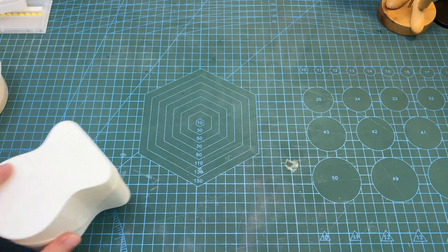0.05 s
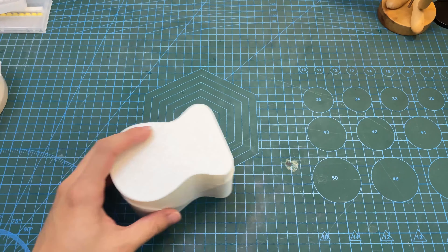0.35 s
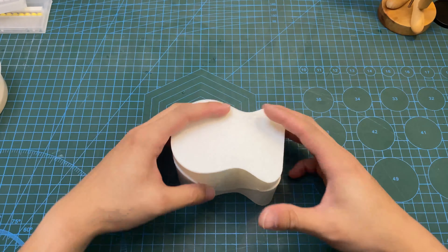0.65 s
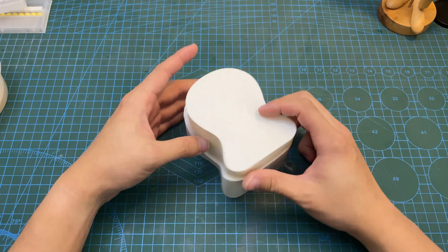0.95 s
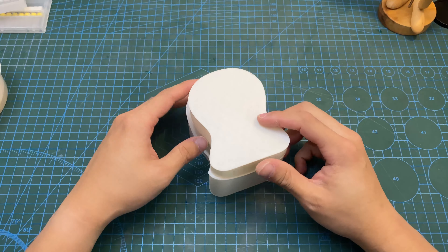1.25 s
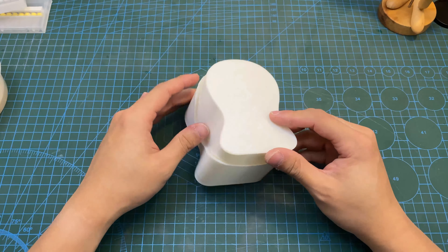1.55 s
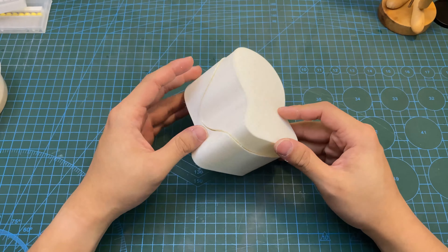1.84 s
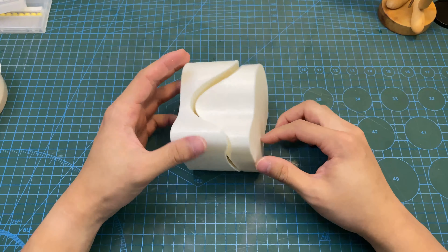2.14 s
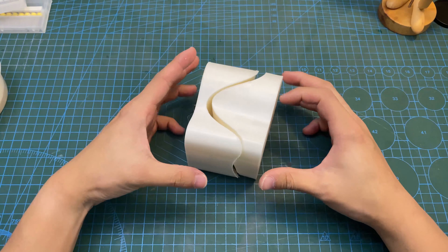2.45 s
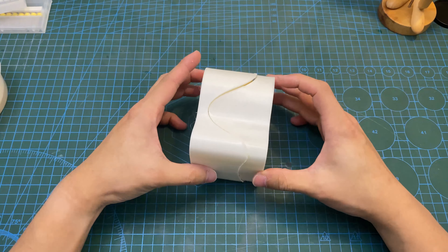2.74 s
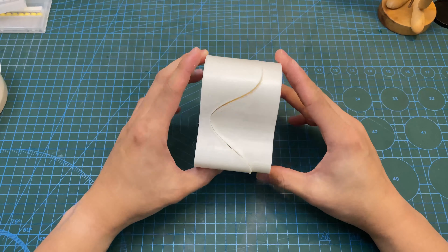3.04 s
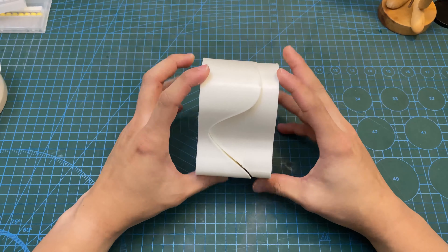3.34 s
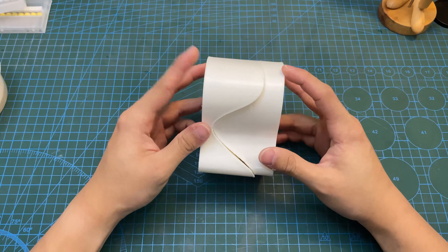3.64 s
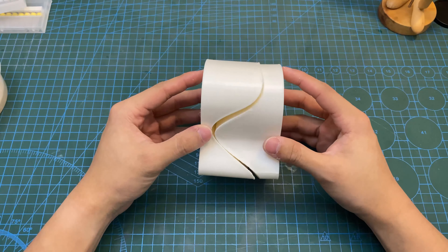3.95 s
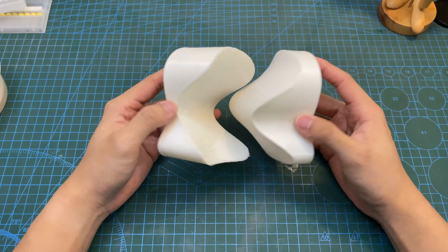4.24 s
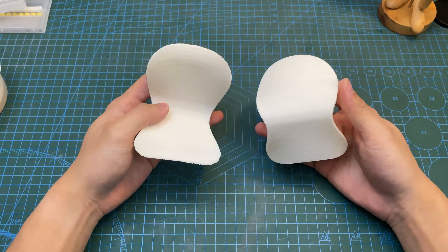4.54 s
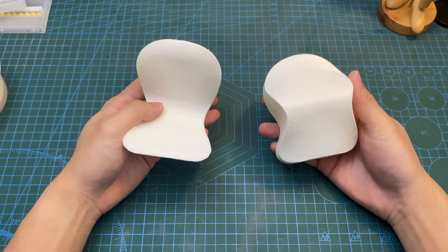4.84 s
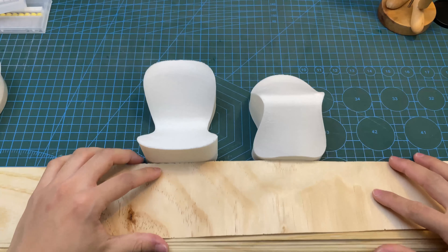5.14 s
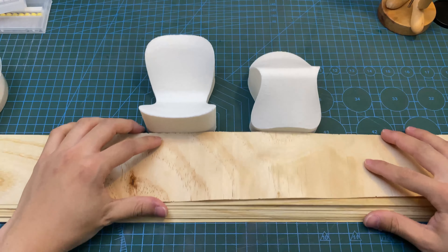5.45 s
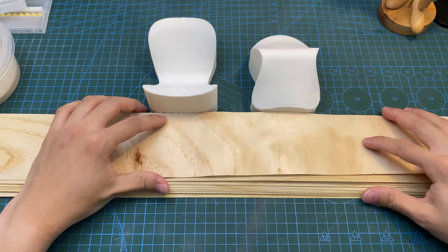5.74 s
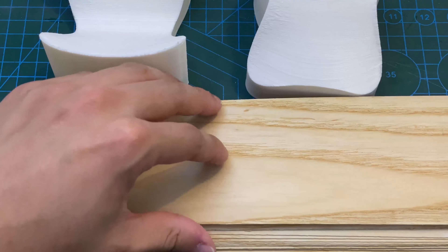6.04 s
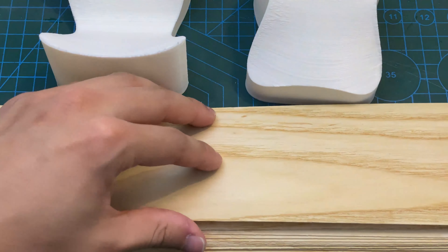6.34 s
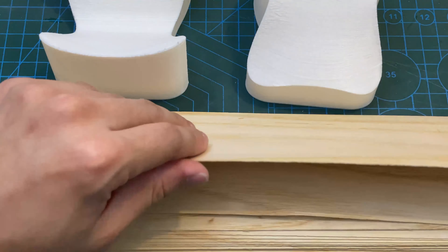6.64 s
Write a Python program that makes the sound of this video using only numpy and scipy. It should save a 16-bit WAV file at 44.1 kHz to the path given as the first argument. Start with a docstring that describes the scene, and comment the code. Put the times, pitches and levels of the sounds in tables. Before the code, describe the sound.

Close hollow plastic scrapes and clacks, followed by sliding plywood, fingers brushing wood and sheets slapping down, with a faint machine hum behind.

```python
"""A hollow two-part plastic form scrapes over a cutting mat, close up, above a faint machine hum.
It knocks on the bench, creaks as its halves are pressed shut, and clacks apart. Then a stack of thin
plywood is pushed across the mat, and fingers brush and lift its sheets, which clap back.
Each rub is a swarm of tiny slips, coloured by the object and swelling with the speed of the hand;
each knock is a dry snap over the short ring of plastic or wood, with a thump from the bench."""
import sys
import numpy as np
from scipy import signal
from scipy.fft import rfft, irfft
from scipy.io import wavfile
from scipy.ndimage import uniform_filter1d

SR = 44100
rng = np.random.default_rng(int(sys.argv[2]) if len(sys.argv) > 2 else 0)


def wrap_up_sound(samples):
    """Save the sound to the file named by the first command line argument, as 16-bit audio."""
    columns = np.atleast_2d(samples).T
    # keep every value between -1 and 1, then stretch to whole-number steps
    tamed = np.clip(columns, -1, 1)
    steps = np.round(tamed * 32767).astype(np.int16)
    wavfile.write(sys.argv[1], SR, steps)


N = 383229
TIME = np.arange(N) / SR
HZ = np.fft.rfftfreq(N, 1 / SR)
RING = np.arange(SR // 3) / SR  # time axis of one hit

# colour of the background rush of air: f/Hz, relative level/dB
AIR_COLOUR = [(15, -36), (25, -23), (54, -2.5), (125, -5), (167, -11.5), (264, -19), (354, -15), (515, -20),
              (729, -18), (1240, -19), (2020, -26.5), (2560, -29.5), (2930, -36.5), (11500, -51.5),
              (15000, -102)]
# tones of the background hum: from t/s, to t/s, f/Hz, width/Hz, level/dB
HUM_TONES = [(0, 8.7, 43.1, 2.6, -54), (0, 6.04, 176.7, 1.88, -59.5), (6.04, 7.6, 175.6, 3.44, -72.5),
             (6.04, 7.6, 292.5, 30, -71), (6.04, 7.6, 536, 72, -78), (7.6, 8.7, 161.8, 4.17, -63),
             (7.6, 8.7, 1260, 167.6, -71), (0, 8.7, 723, 21, -78), (0, 6.04, 1260, 69, -78.5),
             (3.4, 6.04, 2548, 25.3, -79), (7.6, 8.7, 2543, 98, -76.5)]

# stereo likeness of room tone, mat rubs and finger rubs: f/Hz, left-right correlation
ROOM_LIKENESS = [(60, 1), (130, 0.66), (290, 0.49), (640, -0.33), (1410, -0.055), (3100, 0.19),
                 (6820, -0.12), (15000, 0.73)]
MAT_LIKENESS = [(60, 1), (150, 0.99), (290, 0.59), (640, 0.96), (1400, 0.2), (3100, 0.058), (7000, 0.38),
                (12000, 0.79)]
FINGER_LIKENESS = [(60, 0.97), (130, 1), (290, 1), (640, 0.82), (1410, 1), (3100, 1), (6820, 1),
                   (15000, 0.18)]
# stereo balance, with the bass leaning right: f/Hz, left minus right level/dB
BALANCE = [(60, -3.0), (110, -1.5), (200, -5.5), (300, -3.5), (400, -2.5), (560, 0.5), (750, 2), (1290, 0),
           (2380, -0.5), (4400, 2.5), (8120, -1), (15000, 0)]
# lead of the left microphone port over the right at off_axis = 1: f/Hz, phase/rad
PORT_PHASE = [(100, -0.05), (300, -0.26), (650, 1.5), (1500, 1), (3000, 2.04), (5000, 2.5), (6000, 1.55),
              (7500, 1.25), (8700, 5.5), (10500, -1.1), (11600, 0.5), (13000, -6)]

# colours of the rubs: f/Hz, relative level/dB
FINGER_COLOUR = [(100, -1), (250, -5), (400, -5.5), (530, 4.5), (750, 0.5), (900, 8.5), (1130, -6),
                 (1300, 5.5), (1700, -0.5), (2300, -2.5), (2950, -2), (4200, -10.5), (7500, -17),
                 (8500, -21), (11000, -17), (15000, -25.5)]  # fingertips on wood grain
SKIN_COLOUR = [(500, -20), (1000, 3), (2000, -2.5), (4000, -3.5), (8000, -12.5), (11000, -10), (15000, -19)]  # scuffing skin
STACK_COLOUR = [(60, -18), (120, -4), (200, 9), (300, -1.5), (410, -10), (530, 4), (740, -13), (940, 0.5),
                (1100, -7.5), (1300, -0.5), (1680, -6.5), (2050, -12), (2550, -12.5), (3200, -15.5),
                (6500, -18), (8500, -21.5), (11500, -21), (15000, -27)]  # plywood on the mat
FLAT_COLOUR = [(35, -43), (60, -13), (70, -23), (125, -15), (157, -12.5), (196, 4.5), (335, -9),
               (375, -10.5), (479, -11.5), (524, -7.5), (749, -21.5), (837, -5.5), (1140, -15), (1340, -11),
               (1570, -17), (1750, -12), (2000, -21), (2620, -19), (3060, -23.5), (4680, -24.5),
               (8180, -36.5), (10500, -32.5), (12500, -36), (16200, -52), (22000, -120)]  # the form lying on the mat
HELD_COLOUR = [(35, -28), (60, -12), (234, -0.5), (438, -13), (524, -9.5), (586, -13.5), (700, -19),
               (916, -11), (1200, -19), (1370, -17.5), (1530, -24), (1830, -16.5), (2190, -28),
               (2860, -21.5), (4180, -27.5), (4890, -24.5), (5350, -31), (5720, -31), (8360, -37),
               (11200, -34), (12500, -38), (16200, -66), (22000, -120)]  # the form in the hands

# modes of the struck parts: f/Hz, relative level/dB, unstretched t60/s
BENCH_MODES = [(66, -15.5, 0.25), (104.6, -11, 0.24), (126.5, -2.5, 0.15), (188, -3, 0.1), (227, 1.5, 0.11),
               (275, 4.5, 0.035), (323, -7, 0.047), (381, -3, 0.078), (468, -10, 0.06)]
VENEER_MODES = [(1590, 8, 0.018), (1823, 9.5, 0.025), (2750, 1.5, 0.021), (2970, 0.5, 0.021),
                (3470, 3, 0.018), (3900, -3, 0.018), (4520, -1, 0.015), (5070, -6.5, 0.015),
                (5760, -11, 0.012), (6400, -4, 0.013), (6970, -5, .018), (7840, -7, 0.018)]  # the papery top layer of the plywood
SHEET_MODES = [(292, -18, 0.19), (445, -4, 0.053), (512, 3, 0.047), (617, 3, 0.048), (750, -2, 0.048),
               (946, 0, 0.075), (1023, -5, 0.12), (1200, -6, 0.034), (1790, 0.5, 0.042), (2320, 1, 0.063),
               (2670, -1.5, 0.057), (3050, -3, 0.058)]  # one plywood sheet
SHELL_MODES = [(396, -1, 0.033), (522, 1.5, 0.1), (673, -0.5, 0.039), (778, 0, 0.04), (863, 0.5, 0.07),
               (1015, 2, 0.046), (1310, 0, 0.019), (1420, -9, 0.02), (1880, -2.5, 0.05), (1970, -2, 0.065),
               (3104, -6.5, 0.039), (3450, 0, 0.031), (3940, -1, 0.035), (4830, 5.5, 0.034),
               (5670, -8, 0.035)]  # the hollow form
RIM_MODES = [(1930, 1, 0.042), (2800, -4, 0.055), (3190, -1, 0.041), (3950, 4.5, 0.035), (4850, -8, 0.031),
             (5600, -9, 0.036)]  # the rims where its halves meet

# fingertip strokes on the plywood: fastest t/s, rise/s, fall/s, scrape level/dB, hiss/dB re scrape
FINGER_STROKES = [ (5.898, 0.02, 0.063, -74, 3), (6.015, 0.048, 0.017, -60.5, -5),
                  (6.38, 0.084, 0.063, -67.5, -1.5), (6.61, 0.12, 0.057, -59.5, 1.5),
                  (6.84, 0.14, 0.11, -50.5, -6.5), (6.931, 0.026, 0.023, -46.5, -10),
                  (7.04, 0.066, 0.045, -50.5, -7.5), (7.125, 0.046, 0.03, -60.5, -10),
                  (7.215, 0.042, 0.049, -54.5, -6.5), (7.287, 0.014, 0.022, -44, -7),
                  (7.322, 0.014, 0.015, -53.5, -9), (7.40, 0.068, 0.077, -52.5, -2),
                  (7.527, 0.092, 0.0071, -51, 1.5), (7.61, 0.33, 0.15, -62, -3.5),
                  (7.83, 0.068, 0.1, -70.5, 1.5), (8.089, 0.075, 0.056, -68, -5.5),
                  (8.385, 0.031, 0.025, -67.5, 0), (8.63, 0.051, 0.058, -65, 6.5)]
# quick scuffs of skin and edges: middle t/s, length/s, level/dB, resonance f/Hz, width/Hz
SCUFFS = [(0.967, 0.04, -43.5, 3120, 300), (1.013, 0.044, -62, 4200, 900), (1.891, 0.038, -54, 3020, 900),
          (1.302, 0.1, -69, 11200, 1500), (2.05, 0.09, -64, 11300, 400), (2.16, 0.043, -53, 5600, 500),
          (2.183, 0.011, -40.5, 3400, 900), (2.163, 0.037, -48, 1920, 250),
          (2.299, 0.042, -42.5, 1950, 200), (3.075, 0.08, -58.5, 1940, 150), (3.355, 0.018, -46, 1970, 250),
          (3.338, 0.01, -56, 3500, 300), (3.662, 0.016, -49, 2500, 200), (3.691, 0.018, -41.5, 2400, 450),
          (3.787, 0.028, -49, 2530, 253), (3.868, 0.012, -44, 2600, 399), (3.902, 0.066, -58, 2460, 150),
          (7.123, 0.021, -54, 1030, 250), (7.32, 0.012, -54.5, 7800, 250),
          (7.56, 0.0051, -42.5, 6800, 1210), (8.615, 0.076, -63, 2980, 248)]
# plywood claps (the hand grabbing the stack, its edge catching, sheets falling back): t/s, sheet level/dB,
# brightness f/Hz, thump level/dB, ring time factor, tick level/dB,
WOOD_CLAPS = [ (5.034, -43, 3550, -66, 0.68, -48, 1.54, -40, 1500),
              (5.611, -44, 3500, -54, 0.66, -50, 1.44, -35, 1400),
              (6.372, -47, 4030, -70, 0.17, -50.5, 1.6, -51, 2500),
              (6.7135, -51, 3970, -70, 0.25, -38, 0.96, -54, 3000),
              (6.749, -22.5, 2220, -35, 0.907, -31.5, .95, -20.5, 570),
              (6.757, -38, 800, -36, 1.28, -58, 0.99, -33, 330),
              (6.791, -51, 2900, -42, 0.79, -58, 1.2, -42, 1690),
              (6.939, -41, 3500, -60, 0.47, -47, 1.3, -43, 1700),
              (6.980, -50, 3980, -68, .4, -43, 1.1, -50, 2500),
              (7.176, -45, 4000, -52, 0.43, -46, 1.15, -45, 1700),
              (7.278, -48, 3950, -68, 0.62, -48, 1.16, -45, 1700),
              (7.565, -23, 1250, -54, 0.87, -43, 1.08, -21.5, 840),
              (7.571, -23.5, 1000, -28.5, 1.14, -49, 1.24, -31, 650),
              (8.556, -35, 2000, -70, 0.64, -41.5, 1.53, -26.5, 1020)]
# strokes of the form over the mat and through the hands:
# fastest t/s, rise/s, fall/s, scrape level/dB, hiss/dB re scrape, rumble/dB re scrape
FORM_STROKES = [ (0.04, 0.29, 0.16, -45, -5.5, -12), (0.117, 0.015, 0.025, -43.5, -18, -7),
                (0.203, 0.02, 0.015, -44, -14, 1), (0.26, 0.24, 0.32, -41.5, -9, -1.5),
                (0.29, 0.032, 0.021, -41.5, -25, 2.5), (0.465, 0.037, 0.025, -45, -16, -2),
                (0.70, 0.52, 0.23, -51.5, -8.5, 9), (1.0, 0.073, 0.057, -43.5, -9.5, 0),
                (1.31, 0.037, 0.094, -64.5, -6, 7.5), (1.596, 0.043, 0.047, -49.5, -12.5, 1.5),
                (1.70, 0.08, 0.058, -57.5, -13, 12.5), (2.04, 0.083, 0.1, -47, -14.5, 6.5),
                (2.178, 0.036, 0.024, -37, -15.5, 1.5), (2.26, 0.091, 0.041, -49, -16, 9),
                (2.39, 0.038, 0.034, -54, -9.5, 8.5), (2.50, 0.074, 0.1, -62, -5, -1.5),
                (2.61, 0.02, 0.025, -55, -16, 14), (2.705, 0.048, 0.028, -49, -15.5, 7.5),
                (2.89, 0.044, 0.037, -59.5, -12, 6), (2.99, 0.083, 0.055, -63, -15, 17.5),
                (3.11, 0.073, 0.062, -55.5, -17, 9), (3.40, 0.096, 0.056, -62.5, -15, 6.5),
                (3.50, 0.057, 0.035, -68, 0, 12), (3.70, 0.072, 0.049, -57.5, -8.5, 8.5),
                (3.93, 0.11, 0.052, -61.5, -12, 10), (4.08, 0.045, 0.024, -66, -19, 11),
                (4.42, 0.11, 0.13, -61.5, -10, -17), (4.53, 0.077, 0.055, -64.5, -2, -9)]
# hard catches of the rims as the halves slide home: t/s, level/dB
RIM_CATCHES = [(2.585, -46.5), (2.61, -51), (2.624, -53), (2.634, -51), (2.647, -46.5), (2.654, -47),
               (2.674, -51), (2.686, -44), (2.706, -53)]
# knocks of the form: t/s, shell level/dB, base brightness f/Hz, thump level/dB, snap level/dB, snap f/Hz
FORM_KNOCKS = [ (0.246, -35, 2000, -46, -38, 1000), (0.266, -33, 1500, -41, -38, 800),
               (0.291, -34, 800, -25.5, -34, 450), (0.812, -32, 1700, -24, -33.5, 560),
               (0.914, -32.5, 2200, -26, -37, 900), (0.918, -28.5, 1020, -22.5, -34, 455),
               (0.943, -31, 900, -33, -40, 400), (1.067, -49, 550, -32.5, -37, 370),
               (1.345, -56, 400, -36, -39, 300), (1.875, -43, 1560, -31, -47, 550),
               (1.889, -31.5, 750, -28.5, -37, 420), (2.1868, -12.5, 800, -11.5, -16, 710),
               (2.2792, -16, 1560, -12.5, -15.5, 468), (2.311, -29.5, 1600, -19, -28, 403),
               (2.321, -28, 750, -28, -29, 447), (2.331, -25.5, 560, -31, -36, 480),
               (2.341, -31, 520, -39, -41, 450), (2.380, -39, 2300, -30, -49, 400),
               (2.588, -46.5, 3070, -35, -51, 397), (2.633, -41, 1700, -40, -42, 1000),
               (2.722, -43, 4960, -34, -43, 450), (2.847, -38, 2600, -63, -33.5, 1220),
               (3.026, -36, 1540, -34, -38.5, 910), (3.031, -36.5, 1400, -36.5, -39, 756),
               (3.053, -40.5, 1910, -36, -41, 1300), (3.257, -46, 700, -35, -47, 300),
               (3.334, -47, 900, -29.5, -45, 302), (3.344, -31.5, 2550, -26, -32.5, 1500),
               (3.357, -31, 1380, -23, -30, 404), (3.563, -39.5, 1920, -26, -29, 318),
               (3.660, -36.5, 1190, -27, -43, 700), (3.665, -45, 850, -24, -31.5, 387),
               (3.673, -44, 700, -28, -34, 335), (3.879, -41, 1210, -27.5, -38, 303),
               (3.91, -44, 1700, -36, -41, 1400), (3.926, -46, 1800, -39, -42.5, 1400),
               (4.018, -48, 1905, -60, -43, 1690)]


def amp(db):
    """Decibels to gain."""
    return 10 ** (np.asarray(db) / 20)


def unit_rms(x):
    """Scales to rms 1."""
    return x / np.sqrt(np.mean(x ** 2) + 1e-20)


def curve(points, hz=HZ):
    """Reads a spectrum table on a log-frequency axis."""
    f, value = np.transpose(points)
    return np.interp(np.log(hz + 1), np.log(f + 1), value)


def add(mix, s, sound):
    """Drops a sound into the stereo mix at time s."""
    part = mix[:, max(round(s * SR), 0):][:, :sound.shape[-1]]
    part += sound[..., :part.shape[-1]]


def eq(x, gain):
    """Filters a full-length sound with a gain for each frequency."""
    return irfft(rfft(x) * gain, N)


def soften(x, hz, order=2):
    """Low-pass: a softer contact lasts longer and excites less treble."""
    return signal.sosfilt(signal.butter(order, min(hz, SR * .45), fs=SR, output="sos"), x)


def excite(drive, response):
    """Plays a signal through a stereo impulse response."""
    return signal.fftconvolve(drive, response, axes=1)[:, :N]


def stereo(two, likeness):
    """Blends two unrelated sounds into a left and a right with the given correlation."""
    same = np.clip(curve(likeness), -.99, .99)
    mid, side = eq(two[0], np.sqrt(1 + same)), eq(two[1], np.sqrt(1 - same))
    return np.array([mid + side, mid - side])


def wander(hz):
    """Slow random motion of rms 1."""
    return unit_rms(eq(rng.standard_normal(N), 1 / (1 + (HZ / hz) ** 4)))


def during(start, stop):
    """A soft-edged gate, open between two times."""
    return uniform_filter1d(((TIME >= start) & (TIME < stop)) * 1., size=2000)


def stroke(s, rise_s, fall_s):
    """Speed of a hand movement: a bell that swells to 1 at time s and dies away."""
    distance = abs(TIME - s) / np.where(TIME < s, rise_s, fall_s)
    return np.exp(-np.minimum(distance, 10) ** 2.2)


def effort(moves, hiss_power=0.93, rumble_power=0.77):
    """Envelopes of scrape, hiss and rumble: each follows a power of the speed of the moves."""
    energy = np.zeros((3, N))
    for speed, db, hiss_db, rumble_db in moves:
        moving = speed > .001
        swell = speed[moving] ** np.array([[1], [hiss_power], [rumble_power]])
        energy[:, moving] += (amp([[db], [db + hiss_db], [db + rumble_db]]) * swell) ** 2
    return np.sqrt(energy)


def friction(colour, likeness, per_s, spread_db, judder_db, judder_hz, ripple_db, ripple_hz, body_db):
    """Tiny uneven slips ring a body; the hand judders, and the colour ripples as the contact travels."""
    slips = (rng.random((2, N)) < per_s / SR) * rng.standard_normal((2, N))
    slips *= amp(spread_db * np.minimum(rng.exponential(1, N), 4) + judder_db * wander(judder_hz))
    crowded_modes = unit_rms(uniform_filter1d(rng.standard_normal(len(HZ)), size=600))
    body = eq(stereo(slips, likeness), amp(body_db * crowded_modes))
    hz, _, frames = signal.stft(body, SR, nperseg=512, noverlap=384)
    ripple = uniform_filter1d(rng.standard_normal(frames.shape[1:]), size=40, axis=1)
    ripple_bins = max(round(ripple_hz / hz[1]), 1)  # width of one ripple in the spectrum
    ripple = unit_rms(uniform_filter1d(ripple, ripple_bins, axis=0))
    frames = frames * amp(curve(colour, hz)[:, None] + ripple_db * ripple)
    return signal.istft(frames, SR, nperseg=512, noverlap=384)[1][:, :N]


def rub(envelopes, grain, low_hz=450, high_hz=4500):
    """Rides three bands of friction: mid scrape, hiss of light contact, rumble of weight on the bench."""
    low = 1 / (1 + (HZ / low_hz) ** 6)
    high = 1 - 1 / (1 + (HZ / high_hz) ** 6)
    bands = 1 - low - high, high, low
    return sum(gain * unit_rms(eq(grain, band)) for gain, band in zip(envelopes, bands))


def touches(envelope, sound, per_s, db, spread_db=2.5):
    """Chance contacts of uneven size set off a short sound, harder as the envelope swells."""
    size = amp(db + spread_db * np.clip(rng.standard_normal(N), -2, 2))
    hits = (rng.random(N) < per_s / SR) * size * envelope
    return excite(hits[None], sound)


def ring(modes, stretch=1, *, scatter, uneven_db=2.0, apart_hz=550):
    """Damped modes; each blow lands elsewhere, and higher modes reach the two sides out of step."""
    hz, db, t60 = np.transpose(modes)[:, :, None]
    detune, size, turn = rng.standard_normal((3, len(modes), 1))
    skew = np.minimum(hz / apart_hz, 1) * (.5 + .5 * turn)
    gains = rng.choice([-1, 1], (len(modes), 1)) * amp(db + uneven_db * size)
    fade = gains / np.linalg.norm(gains) * amp(-60 * RING / (t60 * stretch))
    phase = 2 * np.pi * hz * (1 + scatter * detune) * RING
    return np.array([(fade * np.sin(phase + side * skew)).sum(0) for side in (-1, 1)])


def crack(t60):
    """The short burst of crowded high modes at the moment of contact."""
    left, right, both = rng.standard_normal((3, len(RING)))
    return (np.array([left, right]) + both) / 2 * amp(-60 * RING / t60)


def thump(rise_s=0.0029):
    """The bench top swells under the soft mat a few milliseconds after a blow."""
    return ring(BENCH_MODES, scatter=0.0096) * (1 - np.exp(-(RING / rise_s) ** 2))


def snap(hz, sweep_s, octaves):
    """The first bending wave through a thin wall: treble outruns bass in a dry, falling snap."""
    f = np.fft.rfftfreq(len(RING), 1 / SR)
    turns = sweep_s * (2 * np.sqrt(1000 * f) - f / 2) + .5 * f / hz
    band = np.exp(-(np.log2((f + 1) / hz) / octaves) ** 2)
    wave = irfft(band * np.exp(-2j * np.pi * turns), len(RING))
    return wave / abs(wave).max() * (RING < RING[-1] / 2)


def room(x, t60=0.42, dull_hz=3500, wet_db=-14):
    """A small furnished room: a short, dull tail of scattered reflections."""
    taps = rng.standard_normal((2, len(RING))) * (rng.random((2, len(RING))) < 2500 / SR)
    taps *= (RING > .005) * amp(-60 * RING / t60)
    tail = soften(taps, dull_hz, order=1) / np.linalg.norm(taps[0])
    return x + amp(wet_db) * excite(x, tail)


def ports(x, off_axis):
    """Sound from the side meets the two microphone ports out of phase, more so at a wider angle."""
    return eq(x, np.exp(.5j * np.array([[1], [-1]]) * off_axis * curve(PORT_PHASE)))


def background(air_db=-54.5, dip_hz=1670, dip_db=-6, dull_s=(6.04, 7.6)):
    """A rush of air and wavering machine tones; the whole bed turns abruptly duller for a while."""
    noise = stereo(rng.standard_normal((2, N)), ROOM_LIKENESS)
    air = amp(air_db) * unit_rms(eq(noise, amp(curve(AIR_COLOUR))))
    upper_mids = eq(air, np.exp(-np.log2((HZ + 1) / dip_hz) ** 2))
    out = air + (amp(dip_db) - 1) * during(*dull_s) * upper_mids
    for start, stop, hz, width_hz, db in HUM_TONES:
        pitch = hz + width_hz / 2 * wander(width_hz)
        tone = np.sin(2 * np.pi * np.cumsum(pitch) / SR) * amp(1.8 * wander(width_hz))
        out += amp(db) * unit_rms(tone) * during(start, stop)
    return out


def fibre_tick():
    """A wood fibre catches and snaps free."""
    return soften(crack(t60=0.009), hz=6000)


def scuffs(skin):
    """Quick scuffs of skin and edges, each singing in one loose resonance."""
    out = np.zeros((2, N))
    for s, length, db, hz, width_hz in SCUFFS:
        near = abs(TIME - s) < 1.5 * length
        sung = signal.lfilter(*signal.iirpeak(hz, hz / width_hz, fs=SR), skin[:, near])
        scuff = unit_rms(unit_rms(sung) + 0.73 * unit_rms(skin[:, near]))
        swell = np.exp(-(2 * (TIME[near] - s) / length) ** 2)
        add(out, TIME[near][0], amp(db) * swell * scuff)
    return out


def fingers(veneer_db=-3, rumble_db=-5.5, shift_db=4, shift_hz=9):
    """Dry fingertips brush the wood grain, ring the thin veneer, catch on fibres and scuff."""
    grain = friction(FINGER_COLOUR, FINGER_LIKENESS, per_s=12000, spread_db=1.5,
                     judder_db=2.0, judder_hz=45.2, ripple_db=2.5, ripple_hz=240, body_db=2.65)
    skin = friction(SKIN_COLOUR, MAT_LIKENESS, per_s=12000, spread_db=1.5,
                    judder_db=1.6, judder_hz=120, ripple_db=1.6, ripple_hz=300, body_db=2.5)
    envelopes = effort((stroke(s, rise, fall), db, hiss_db, rumble_db)
                       for s, rise, fall, db, hiss_db in FINGER_STROKES)
    # the veneer's modes shift as the fingertips press it down in other places
    places = [excite(skin, ring(VENEER_MODES, scatter=0.008)) for _ in range(3)]
    papery = sum(place * amp(shift_db * wander(shift_hz)) for place in places)
    brushing = rub(envelopes, unit_rms(grain) + amp(veneer_db) * unit_rms(papery))
    return brushing + touches(envelopes[0], fibre_tick(), per_s=83, db=7) + scuffs(skin)


def slide_envelope(start_s, onset, settle_s, ease_s=5.587, slow_s=0.19):
    """The sliding sound starts abruptly at `onset` times its steady level, settles and eases to a stop."""
    glide = 1 - (1 - onset) * np.exp(-np.maximum(TIME - start_s, 0) / settle_s)
    stopping = np.exp(-(np.maximum(TIME - ease_s, 0) / slow_s) ** 2)
    return (TIME >= start_s) * glide * stopping


def plywood_slide(thin_hz=950, unsteady_db=0.7, unsteady_hz=18):
    """The top sheets slide first, the pile drags after them, and its edge catches on the mat."""
    grain = friction(STACK_COLOUR, MAT_LIKENESS, per_s=16000, spread_db=1.0,
                     judder_db=0.5, judder_hz=69.0, ripple_db=1.3, ripple_hz=150, body_db=2.0)
    thin = eq(grain, 1 - 1 / (1 + (HZ / thin_hz) ** 4))  # the light top sheets alone have no body
    top = slide_envelope(5.03, onset=0.63, settle_s=0.24)
    pile = slide_envelope(5.122, onset=1.3, settle_s=0.087)
    top_db, pile_db = (-46.5, -9.5, -18), (-54.5, -17.5, 6)  # scrape, then hiss and rumble re scrape
    out = rub(effort([(top, *top_db)], hiss_power=0.81), thin)
    out += rub(effort([(pile, *pile_db)], rumble_power=0.62), grain)
    out *= amp(unsteady_db * wander(unsteady_hz))
    out += touches(top, fibre_tick(), per_s=90, db=-52)
    catch = stroke(5.605, rise_s=0.066, fall_s=0.018)
    edge = ring(VENEER_MODES, stretch=0.54, scatter=0.047) + ring(SHEET_MODES, stretch=0.32, scatter=0.047)
    return out + touches(catch, soften(edge, hz=3700), per_s=190, db=-49)


def plywood_claps():
    """The hand grabs the stack, its edge catches at the end of the push, and lifted sheets fall back on the
    pile: each a tick and a snap, a woody ring, a thump from the bench."""
    out = np.zeros((2, N))
    for s, sheet_db, contact_hz, thump_db, stretch, tick_db, pitch, snap_db, snap_hz in WOOD_CLAPS:
        modes = ring(np.multiply(SHEET_MODES, (pitch, 1, 1)), stretch, scatter=0.016)
        sheet = soften(modes + amp(-10) * crack(t60=0.037 * stretch), contact_hz)
        add(out, s, amp(sheet_db) * sheet + amp(thump_db) * thump() + amp(tick_db) * crack(t60=0.021))
        add(out, s, amp(snap_db) * snap(snap_hz, sweep_s=0.002986 * stretch / pitch, octaves=1.08))
    flap = ring([(73.7, 0, 0.31)], scatter=.01)  # a released sheet flaps as a whole
    add(out, 7.575, amp(-37.5) * flap)
    return out


def form_grain(lift_s=1.6, flat_shell_db=-15, held_shell_db=-10, drone_db=-7.5):
    """Rubbing rings shell and bench; the mat damps the shell until the hands take the form's weight."""
    flat = friction(FLAT_COLOUR, MAT_LIKENESS, per_s=9000, spread_db=2.0,
                    judder_db=0.57, judder_hz=59.7, ripple_db=2.5, ripple_hz=200, body_db=2.04)
    held = friction(HELD_COLOUR, MAT_LIKENESS, per_s=12000, spread_db=2.2,
                    judder_db=0.65, judder_hz=60, ripple_db=2.0, ripple_hz=200, body_db=2.0)
    lifted = during(lift_s, TIME[-1])
    grain = unit_rms(flat) * (1 - lifted) + unit_rms(held) * lifted
    hollow = unit_rms(excite(grain, ring(SHELL_MODES, scatter=0.0023)))
    drone = unit_rms(excite(grain, ring(BENCH_MODES, scatter=0.003)))
    shell_db = flat_shell_db + (held_shell_db - flat_shell_db) * lifted
    return grain + amp(shell_db) * hollow + amp(drone_db) * drone


def form_creak(span_s=(2.587, 2.715), per_s=63, jitter=0.19, slip_db=-47, uneven_db=3):
    """The halves stick and slip as they are pressed shut, ringing shell and rims; a few slips catch hard."""
    out = np.zeros((2, N))
    rim = ring(RIM_MODES, scatter=.003)
    shell = soften(ring(SHELL_MODES, scatter=0.012), hz=6000)
    slip = amp(-4) * shell + amp(-6) * rim
    for s, late, size in zip(np.arange(*span_s, 1 / per_s), *rng.standard_normal((2, 100))):
        add(out, s + jitter * late / per_s, amp(slip_db + uneven_db * size) * slip)
    for s, db in RIM_CATCHES:
        catch = ring(RIM_MODES, scatter=0.0044) + amp(1) * soften(crack(t60=.012), hz=6000)
        add(out, s, amp(db) * catch)
    return out


def form_knocks(chatter_s=0.003334, chatter=0.57):
    """Hollow plastic clacks over a bench thump; the loose halves touch again just after each blow."""
    out = np.zeros((2, N))
    for s, shell_db, contact_hz, thump_db, snap_db, snap_hz in FORM_KNOCKS:
        for delay, share in ((0, 1), (chatter_s, chatter)):
            shell = ring(SHELL_MODES, scatter=0.016, uneven_db=4.0) + amp(1) * crack(t60=0.055)
            add(out, s + delay, share * amp(shell_db) * soften(shell, contact_hz * 1.1))
        tick = soften(crack(t60=0.027), contact_hz * 4, order=1)
        add(out, s, amp(shell_db - 10.5) * soften(tick, hz=13600, order=4))  # the tick has almost nothing above 13.6 kHz
        add(out, s, amp(thump_db) * thump() + amp(snap_db) * snap(snap_hz, sweep_s=0.003993, octaves=1.05))
    return out


def form():
    """The plastic form scrapes, creaks and knocks; as it moves, its halves rattle and grit ticks under it."""
    envelopes = effort((stroke(s, rise, fall), *levels) for s, rise, fall, *levels in FORM_STROKES)
    out = rub(envelopes, form_grain()) + form_creak()
    rattle = ring(SHELL_MODES, stretch=0.74, scatter=0.009)
    out += touches(envelopes[0], soften(rattle, hz=1410), per_s=26, db=4)
    grit = crack(t60=0.013) + amp(-8) * ring(SHELL_MODES, stretch=0.32, scatter=0.0035)
    out += touches(envelopes[0], soften(grit, hz=4200), per_s=98, db=-0.5)
    return out + form_knocks()


def scene():
    """Form, plywood and fingers, placed in stereo and set in the room over the background hum."""
    bench = ports(form(), off_axis=0.98)
    bench += ports(plywood_slide() + plywood_claps(), off_axis=0.87)
    bench += ports(fingers(), off_axis=0.4)
    balance = amp(np.array([[.5], [-.5]]) * curve(BALANCE))
    return eq(room(bench) + background(), balance)


def record(dry, edge_hz=15900):
    """The whole sound has thin deep bass, a dip near 13.5 kHz and nothing above about 16 kHz."""
    response = [(28, -14), (38, -1), (12300, 1.5), (13500, -7.0), (16000, 4.0)]  # f/Hz, level/dB
    band_limit = signal.firwin(511, edge_hz, window=("kaiser", 9), fs=SR)
    return signal.oaconvolve(eq(dry, amp(curve(response))), band_limit[None], "same")


dry = scene()
out = record(dry)
wrap_up_sound(out)
```